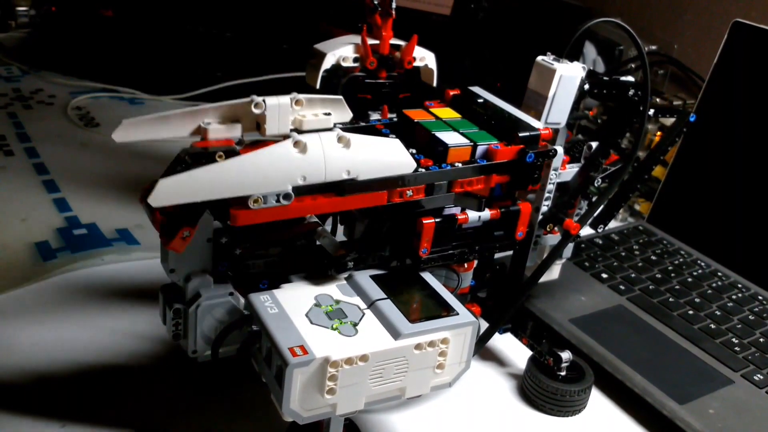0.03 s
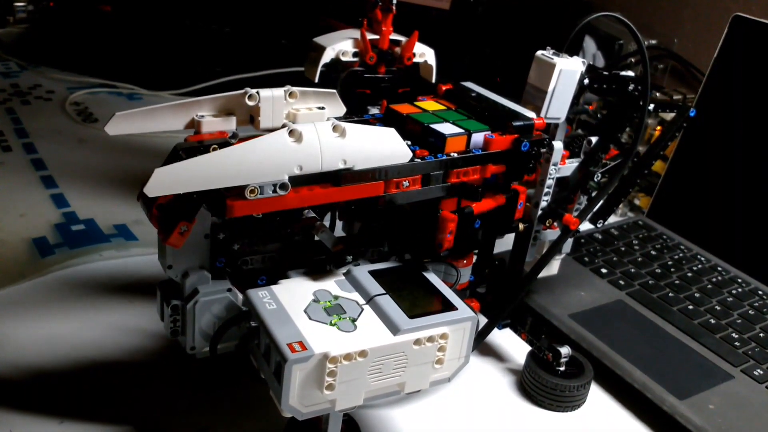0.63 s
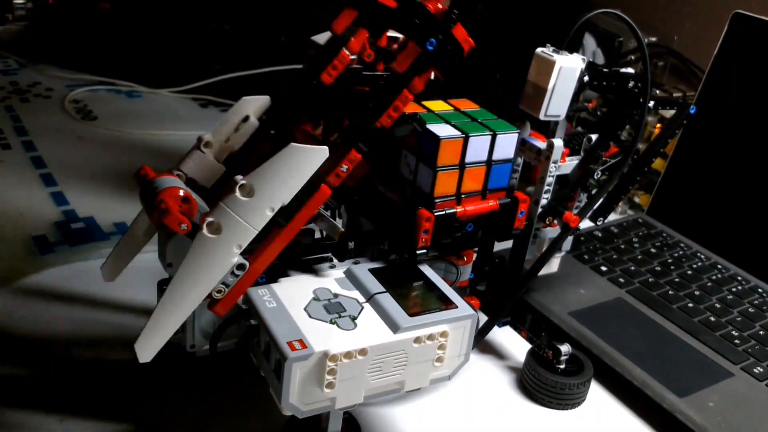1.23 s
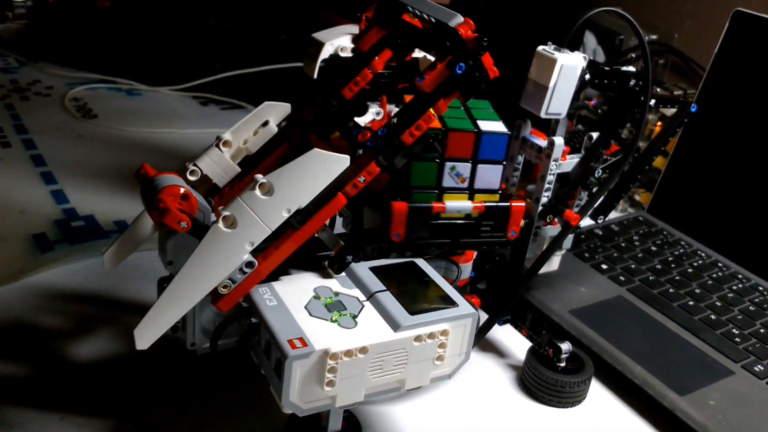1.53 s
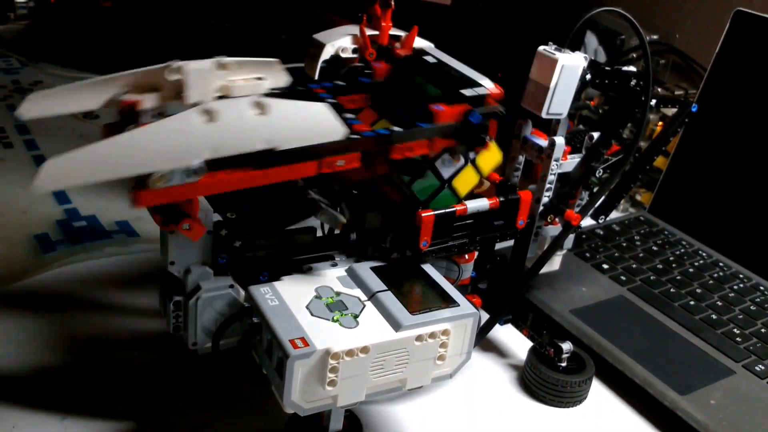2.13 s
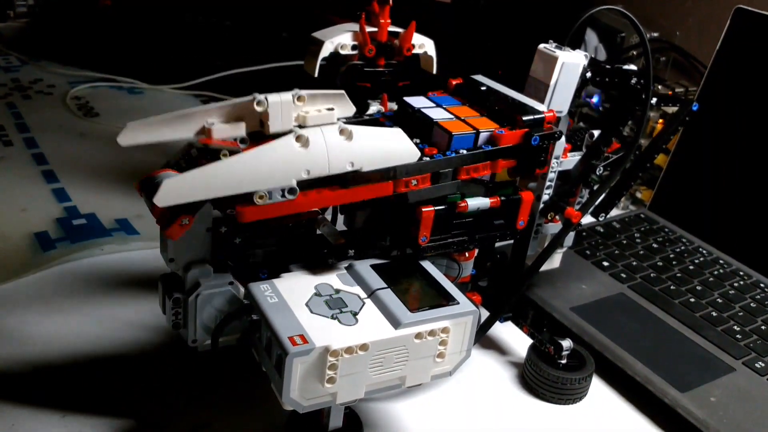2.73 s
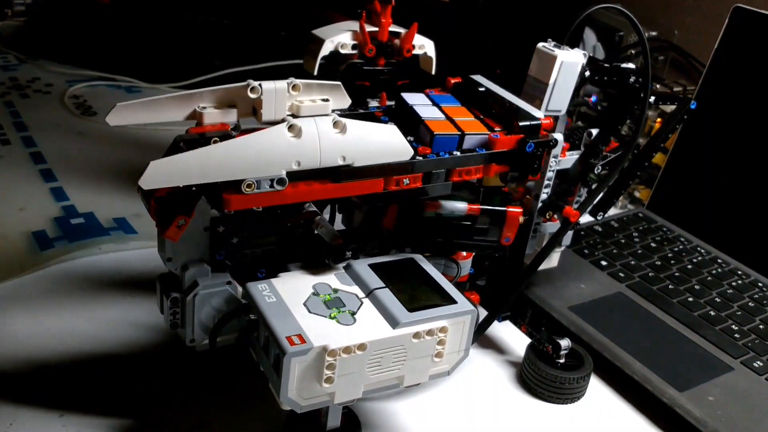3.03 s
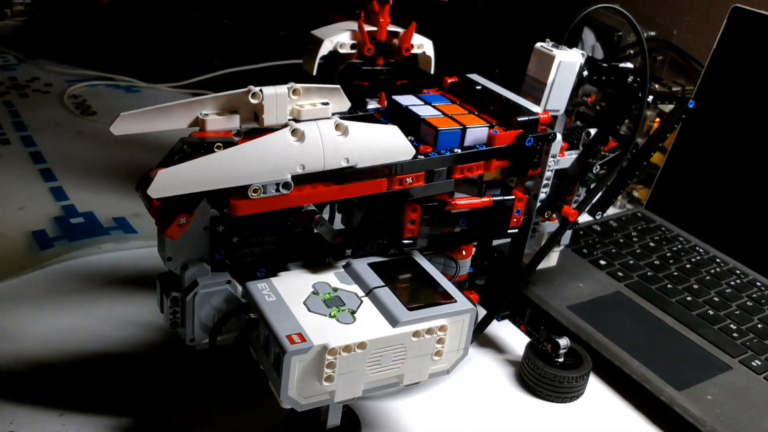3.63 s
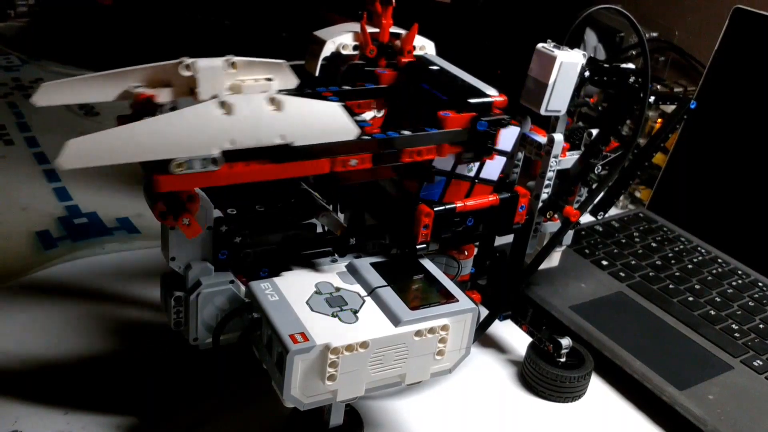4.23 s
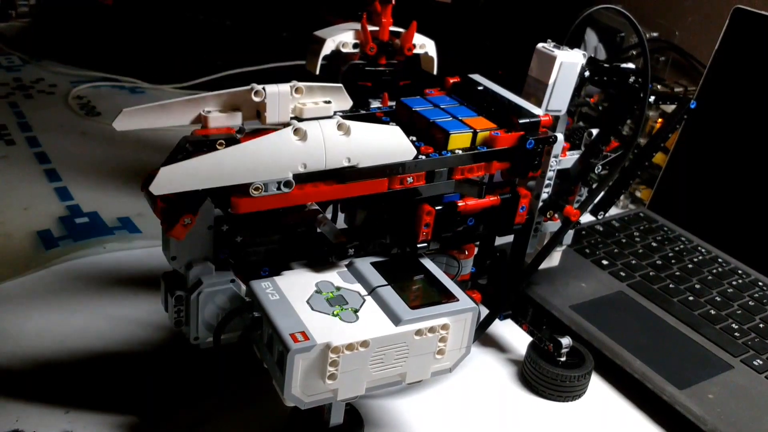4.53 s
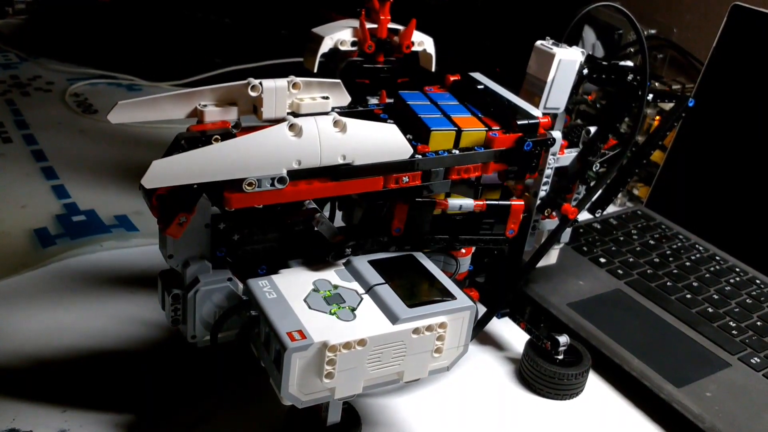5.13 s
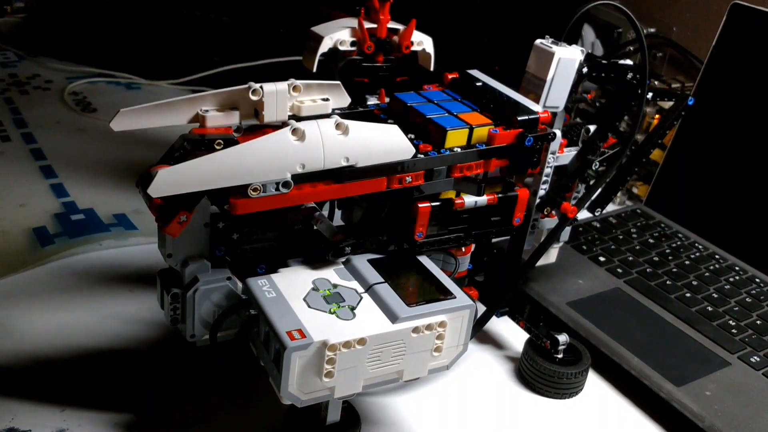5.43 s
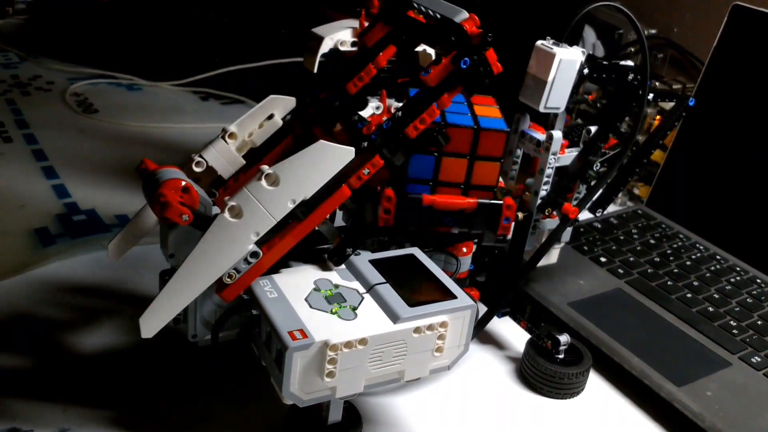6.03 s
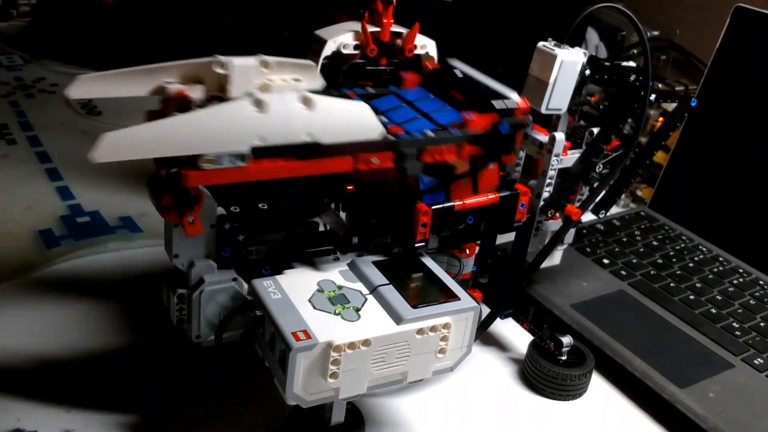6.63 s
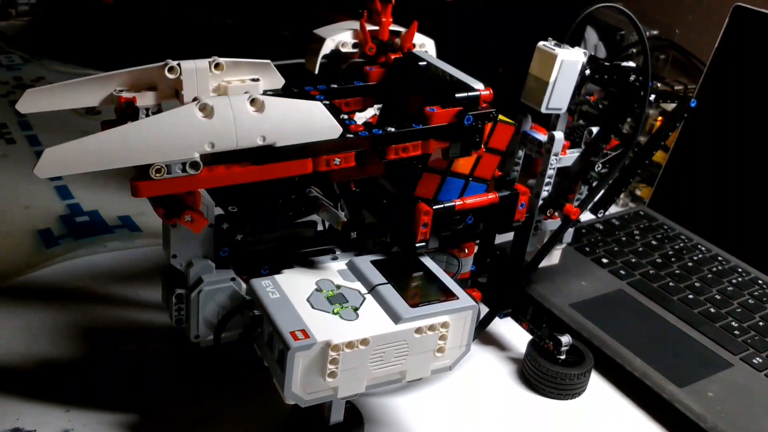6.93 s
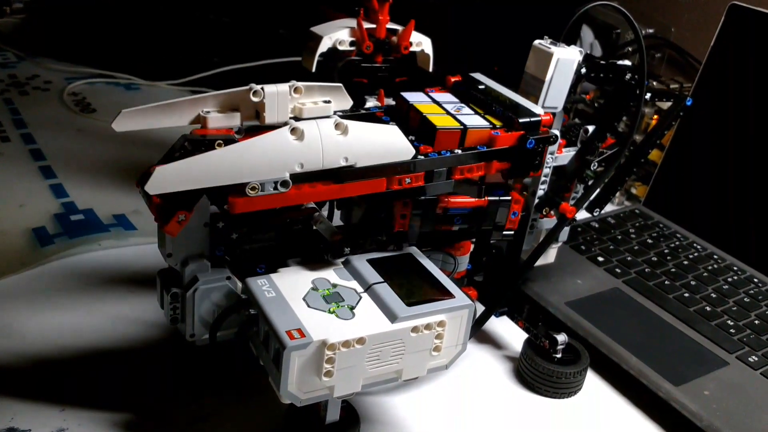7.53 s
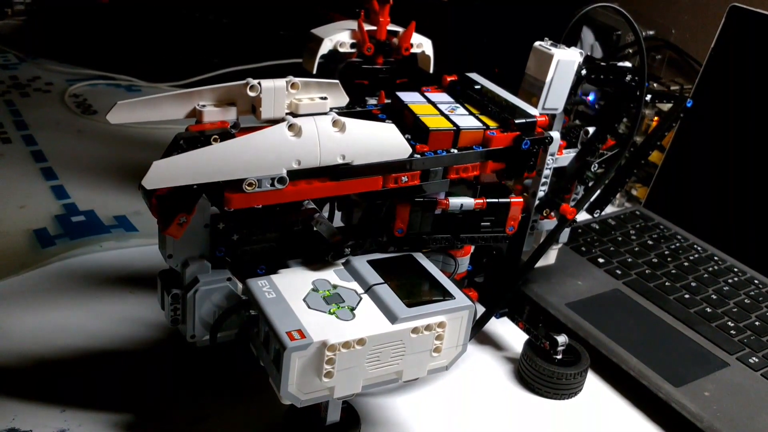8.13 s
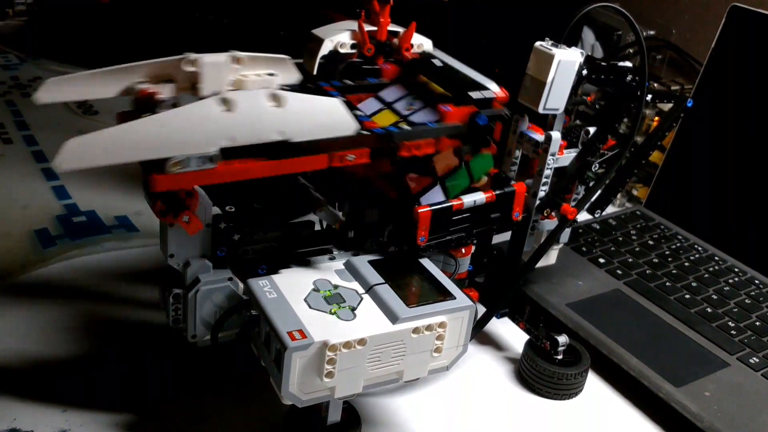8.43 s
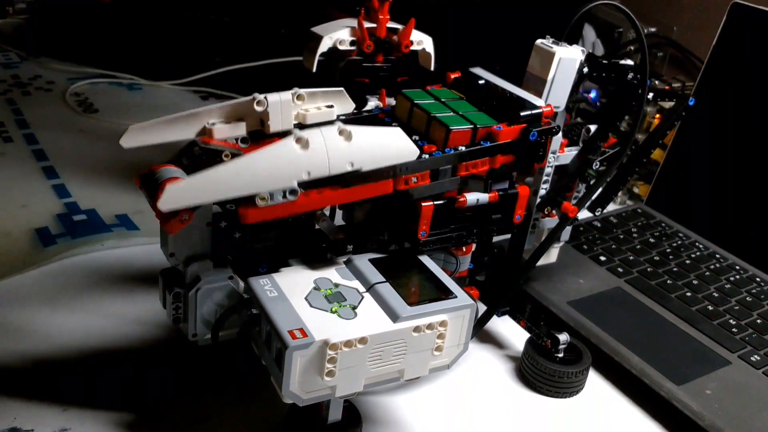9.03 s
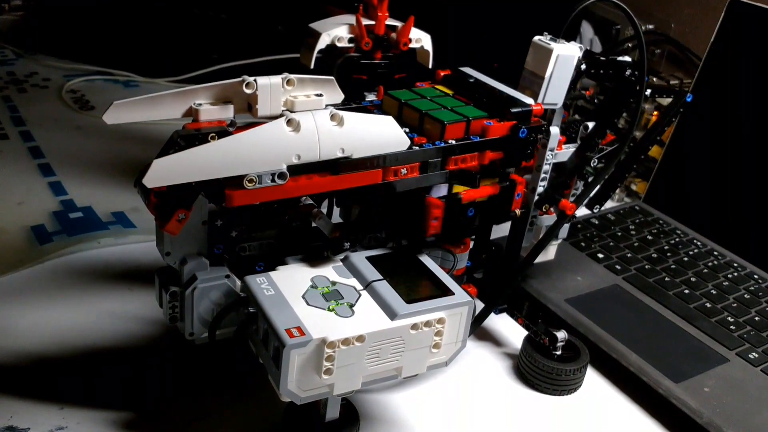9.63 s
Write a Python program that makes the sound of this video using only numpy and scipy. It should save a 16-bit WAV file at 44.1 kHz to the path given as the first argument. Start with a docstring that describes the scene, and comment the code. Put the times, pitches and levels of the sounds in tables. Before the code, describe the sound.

A toy-brick robot's motors whine and rattle in stop-start strokes while a plastic puzzle cube clacks in its cradle, heard up close.

```python
"""On a table in a quiet room, a toy-brick robot works a puzzle cube close to a pair of microphones.
Two geared motors take turns: one spins the turntable, the other lifts the arm and flips the cube.
Periodic meshing of their plastic teeth makes a whine, uneven impacts make a rattle, and the housings
filter both. Blows excite the cube's damped modes as it clacks in its cradle; the frame thuds dully
and the room hums behind."""
import sys
import numpy as np
from scipy import signal
from scipy.fft import rfft, irfft, next_fast_len
from scipy.io import wavfile
from scipy.ndimage import uniform_filter1d

SR = 44100
rng = np.random.default_rng(int(sys.argv[2]) if len(sys.argv) > 2 else 0)


def master(y):
    """Save y as 16-bit WAV."""
    cut = np.clip(np.atleast_2d(y).T, -1, 1)
    pcm = np.round(cut * 32767)  # scale
    wavfile.write(sys.argv[1], SR, pcm.astype(np.int16))


N = 435266
TIME = np.arange(N) / SR
FFT_SIZE = next_fast_len(N + SR // 2)
BINS = np.fft.rfftfreq(FFT_SIZE, 1 / SR)

# Turntable moves. Each row: start, drive time and braking time in seconds, level and relative whine
# in dB, free-running tooth rate in Hz, share of free spin, share of twisting the held cube.
TURNTABLE_MOVES = [(-.005, 0.042, 0.15, -34.5, -24, 852.5, 0.01, 0.06),
                   (.15, 0.058, 0.062, -57, 14, 862.3, 0.02, 0),
                   (.207, 0.42, 0.15, -29.5, 4.5, 1076, 0.86, 0.02),
                   (.848, .11, 0.14, -31.5, -6, 1068, 0, 0.56),
                   (1.278, 0.32, 0.2, -31, 4.5, 1117, 0.97, 0.01),
                   (2.916, 0.45, 0.17, -29, -4, 1055, 0.05, 0.98),
                   (3.57, 0.11, 0.14, -32.5, -2, 1068, 0, 0.01),
                   (4.7, .438, .165, -29.5, -3.5, 1065, 0.02, 0.96),
                   (5.358, .1, .165, -31, .5, 1055, 0.05, 0), (5.815, 0.32, 0.23, -31.5, 1, 1129, 0.86, 0),
                   (7.485, .422, .15, -29.5, -2.5, 1068, 0, 0.98),
                   (8.129, 0.097, 0.15, -33, 3.5, 1062, 0.02, 0.01),
                   (9.243, 0.7, .15, -30, 7, 1074, 1, 0.01)]
# Arm strokes; tipping the cube takes a push and a pull, each with a nudge after it. Each row: start,
# drive time and braking time in seconds, level and relative whine in dB, free-running tooth rate
# in Hz, level of the cube's jiggling in dB.
ARM_STROKES = [(1.044, 0.12, 0.26, -26, -11.5, 971, -55), (1.69, 0.15, 0.16, -28.5, -8.5, 932, -50),
               (2.019, 0.15, 0.59, -31.5, -11, 960.4, -52), (2.443, 0.22, .2, -29, -9, 930, -42),
               (2.708, 0.072, 0.11, -31.5, -10, 948, -50), (3.775, 0.17, 0.28, -28.5, -15, 902.5, -57),
               (4.04, 0.079, 0.12, -35.5, -3, 927, -39.5), (4.222, 0.16, .3, -28, -26, 975.4, -50),
               (4.493, 0.043, 0.13, -32.5, -5, 933.5, -56), (5.586, .13, .27, -24, -13.5, 937.5, -64),
               (6.25, .12, 0.17, -25.5, -29, 936, -41), (6.571, .16, 0.2, -30, -7.5, 875.5, -51.5),
               (6.83, .04, .18, -36.5, 1, 923, -37.5), (7.012, 0.19, 0.2, -27.5, -28, 963, -57),
               (7.269, 0.023, 0.23, -33, -14, 950, -52.5), (8.322, 0.16, 0.36, -26, -9.5, 873, -40),
               (8.588, 0.045, 0.18, -34.5, 6, 926.5, -37.5), (8.76, 0.22, 0.072, -28, -27, 970.5, -40),
               (9.022, 0.04, 0.18, -33.5, -10, 975, -54)]
# Envelope settings of each motor's moves.
TURNTABLE_ENVELOPE = dict(rise_s=.03, rise_share=.16, surge_db=2.5, surge_s=.08, fade=2.7)
ARM_ENVELOPE = dict(rise_s=.036, rise_share=.48, surge_db=2.2, surge_s=.07, fade=2.84)
# Relative levels in dB of successive harmonics of the tooth rate.
TURNTABLE_HARMONICS = [-14, -10.3, -12, -9.5, -14.5]
ARM_HARMONICS = [-22, -10, -6, -5, -7.5, -12, -14, -12, -17, -17, -14, -12, -15]
# The turntable's second pair of wheels. Each row: multiple of the tooth rate, relative level in dB.
SECOND_MESH = [(2.4, -18), (2.6, -24), (3.4, -21), (5.4, -21)]
# Gears sing until the load catches them. Each row: peak time and half-length in seconds, swell in dB,
# share of speed lost.
TURNTABLE_SQUEALS = [(.325, 0.056, 10, 0), (.395, 0.017, 13.5, 0), (.652, .03, 9, 0.03),
                     (1.385, 0.041, 4.5, 0), (3.052, 0.047, 14, 0.01), (3.117, 0.028, 16, 0.04),
                     (3.262, 0.023, 19, 0), (3.378, 0.027, 10, 0), (4.838, 0.049, 13.5, 0.04),
                     (4.903, 0.028, 11, .06), (5.152, 0.033, 15, 0.03), (5.93, 0.052, 10.5, 0.03),
                     (7.625, .055, 10.5, 0.05), (7.694, 0.021, 11.5, 0.11), (7.835, 0.023, 20, 0.06),
                     (7.922, 0.027, 20, 0), (9.365, 0.053, 9, 0.03), (9.42, .03, 8, .01)]
ARM_CHIRPS = [(1.163, .04, 10, 0.01), (5.688, .028, 8.5, 0.01), (5.724, .024, 7.5, 0.11),
              (6.69, .045, 4, 0), (8.465, .04, 4, .02)]
# Broad responses of the gear housings. Each row: frequency in Hz, relative gain in dB.
TURNTABLE_RESPONSE = [(80, -8), (600, -18), (1150, -14), (2300, -6), (3300, -11), (4000, -0.5),
                      (4700, -2.5), (6300, -2.5), (8200, -3), (10500, 3.5), (12300, 1.5), (13300, -6),
                      (15700, -10)]
ARM_RESPONSE = [(80, -11), (600, -20), (1000, -9), (1500, -7), (3000, -2), (4600, -4), (6500, 2.5),
                (7900, 0.5), (10600, 3), (12000, 2.5), (14000, -8.5), (15700, -6)]
# Resonances and gaps. Each row: centre and width in Hz, gain in dB.
TURNTABLE_RESONANCES = [(1460, 600, 13.2), (2765, 670, 14.8), (3610, 100, 8.8), (6980, 2750, 9.6),
                        (9060, 350, 6.3)]
SPIN_RESONANCES = [(1550, 500, -5), (2800, 400, -4), (3950, 500, -5), (4850, 400, -5), (5650, 300, -3),
                   (7500, 300, 5), (8050, 300, -3), (9550, 450, 9), (10720, 500, 5.5)]  # while the cube spins freely
TWIST_RESONANCES = [(1050, 90, 4), (1450, 300, -3), (2060, 200, 9), (2800, 260, 1), (3330, 200, -4),
                    (8700, 250, 4), (9970, 280, 12), (12350, 700, 6)]  # while one layer is twisted against the arm
ARM_RESONANCES = [(1420, 300, 7), (2540, 300, 7), (3830, 300, 4), (4300, 1350, 8.2), (5550, 700, 2),
                  (9000, 900, 4), (10550, 400, 2.5), (11450, 450, 2), (12400, 900, -1)]
FRAME_RESONANCES = [(85.6, 40, 17.5), (148, 19, 16), (258, 22, 2.5)]  # the whole frame on the table
# Room noise. Each row: frequency in Hz, relative spectral density in dB.
ROOM_SPECTRUM = [(20, -46), (50, -13), (90, 10), (150, -0.5), (260, 1.5), (500, -3.5), (800, -2.5),
                 (1300, -12), (2400, -5), (3300, -21.5), (4000, -16), (8000, -21.5), (11000, -24),
                 (15700, -32)]
# Electronic whistles. Each row: frequency in Hz, level in dB.
WHISTLE_TONES = [(13220, -74), (14480, -74)]
# Thuds of the frame. Each row: start in seconds, level in dB, length in seconds, pitch in Hz.
FRAME_THUDS = [(0.371, -44.5, 0.019, 560), (0.522, -36, 0.08, 197), (.91, -42, 0.076, 130.4),
               (1.075, -57, 0.035, 120.6), (1.305, -33.5, 0.061, 223), (1.312, -47, 0.0693, 90.1),
               (1.827, -43.5, 0.051, 898), (2.873, -42.5, 0.046, 169.1), (2.869, -38, 0.076, 85),
               (3.083, -49, 0.029, 811), (5.051, -43, 0.066, 106), (7.191, -52, 0.18, 148.3),
               (9.035, -49, 0.027, 560)]
# Plastic clacks. Each row: start in seconds, level in dB, crack against ring in dB, pitch in Hz.
CUBE_CLACKS = [(.677, -26, -4, 1287), (1.081, -34, -2, 1360), (1.122, -27.5, 9.5, 1280),
               (1.798, -23, 2.5, 1360), (1.815, -30, -3, 1370), (1.847, -20.5, -7, 1366),
               (1.855, -26.5, 11.5, 1310), (2.104, -28, 4, 1503), (2.214, -28, -16, 1370),
               (2.233, -17.5, -14, 1412), (2.249, -18.5, -6, 1410), (2.263, -36, -3, 1330),
               (2.277, -39, -2, 1392), (2.328, -29, -2, 1450), (2.394, -39, 3, 1410),
               (2.586, -18, -2.5, 1460), (3.082, -19, -4, 1670), (3.089, -29, -10, 1042),
               (3.268, -32.5, 13, 1298), (3.852, -27.5, 9, 1446), (3.957, -27, -12, 1470),
               (4.02, -25, -1, 1417), (4.12, -22, -9, 1346), (4.229, -46, 11, 1398),
               (4.344, -24, -19, 1639), (4.38, -24.5, 8, 1328), (4.42, -26, -11, 1380),
               (4.467, -34, 14.5, 1408), (5.742, -38, 15, 1250), (6.351, -23, 3.5, 1397),
               (6.383, -32, 13.5, 1412), (6.65, -30.5, 5, 1358), (6.786, -23.5, -23, 1377),
               (6.807, -29, -18, 1360), (6.846, -34, -15, 1388), (6.878, -42, -18, 1510),
               (6.904, -27.5, 4, 1650), (6.946, -34, -9, 1500), (6.963, -38, -14, 1480),
               (6.99, -32, -13, 1406), (7.073, -23.5, 0, 1320), (7.148, -18.5, -4, 1370),
               (7.203, -22.5, -9, 1377), (7.253, -26, -2, 1405), (7.597, -28, 0, 1350),
               (7.661, -28.5, -8, 1324), (7.802, -30, -3, 1332), (7.832, -28, 5, 1391),
               (8.412, -28, 6.5, 1405), (8.492, -33, -17, 1360), (8.52, -32, -12, 1310),
               (8.561, -20.5, -13, 1470), (8.568, -27.5, 6.5, 1750), (8.642, -27, 2, 1480),
               (8.661, -27, -16, 1460), (8.743, -25, -11, 1370), (8.759, -27, -11, 1449),
               (8.818, -23, -9, 1333), (8.843, -17, -18, 1557), (8.925, -30.5, 11.5, 1334),
               (8.942, -27, -12, 1415), (8.966, -32.5, 6, 1454), (8.986, -32.5, 12.5, 1449),
               (9.362, -24, -11, 1346), (9.698, -23.5, -4.5, 1390), (9.742, -32, -19, 1405)]
# The cube in its cradle. Each row: nominal frequency in Hz, relative level in dB, t60 in seconds.
CRADLED_MODES = [(730, -20, .022), (860, -16, .028), (1300, -5, .022), (1420, 0, .022), (1550, -2, .02),
                 (1690, -9, .014), (2250, -6, .011), (2750, -5, .013), (3600, -5, .013), (5400, -10, .009)]
# Runs of ticks in the arm's gears. Each row: start and length in seconds, level in dB.
TICK_RUNS = [(1.952, .06, -55), (2.449, .01, -34), (2.871, .03, -48), (4.222, .022, -40),
             (4.668, .035, -45), (6.53, .035, -51.5), (6.981, .05, -41), (8.754, .025, -33),
             (9.196, .045, -51)]
# Reverberation of the room. Each row: frequency in Hz, t60 in seconds.
ROOM_DECAY = [(200, 0.45), (1500, 0.38), (6000, 0.3), (15000, 0.0047)]
# Likeness of the two microphones at its best. Each row: frequency in Hz, coherence from 0 to 1.
COHERENCE = [(50, .95), (300, .8), (1000, .99), (2150, .995), (4400, .985), (6450, .97), (7500, .88),
             (9000, .62), (12000, .55), (16000, .35)]
# Lead of the left port beyond the regular comb. Each row: frequency in Hz, phase in radians.
LEFT_LEAD = [(130, -2.8), (230, -.2), (700, 0), (1100, 0), (1600, .8), (1850, .7), (2100, 0), (3700, 0),
             (4400, .25), (5200, 0), (7700, 0), (8100, -1.3), (9000, -1.6), (9400, 0)]
# Balance of each source. Each row: frequency in Hz, left minus right in dB.
TURNTABLE_BALANCE = [(2500, .7), (2950, -2.5), (4200, .5), (4800, -1.5), (6000, 0), (7500, -2), (8700, 5),
                     (9300, -8), (10000, -9), (11000, -5.5), (12400, -6), (12900, 0), (14200, -5),
                     (15500, -2)]
ARM_BALANCE = [(1500, 0), (2950, -4), (3600, 3), (4700, -2.5), (6500, -.5), (8300, 0), (8800, -5.5),
               (9400, -.5), (11400, -7), (13000, -7), (14000, -1)]
ROOM_BALANCE = [(1000, 0.5), (8000, -1.5), (11000, -1), (14000, -3)]


def amp(db):
    """Amplitude grows tenfold with every 20 dB."""
    return 10 ** (np.asarray(db) / 20)


def unit(x):
    """Normalisation to an rms of 1."""
    return x / np.sqrt(np.mean(x ** 2) + 1e-20)


def curve(points, hz=BINS):
    """Interpolation on a logarithmic frequency axis."""
    knots_hz, values = np.transpose(points)
    return np.interp(np.log(hz + 1), np.log(knots_hz + 1), values)


def filtered(x, gain):
    """Linear filtering: the spectrum is multiplied by a gain at each frequency."""
    return irfft(rfft(x, FFT_SIZE) * gain, FFT_SIZE)[..., :N]


def add(mix, start_s, sound):
    """Superposition: a sound sums into the mix from its start time."""
    part = mix[max(round(start_s * SR), 0):][:len(sound)]
    part += sound[:len(part)]


def drift(hz):
    """Random fluctuation of rms 1, lying mostly below hz."""
    points = rng.standard_normal(30000)
    return unit(np.interp(2 * hz * TIME, np.arange(len(points)), points))


def held(moves, column):
    """Sample and hold: a move's value lasts until the next move starts."""
    rows = np.array(moves)
    index = np.maximum(np.searchsorted(rows[:, 0], TIME) - 1, 0)
    return rows[index, column]


def motion(moves, inertia_s):
    """Inertia: speed nears its free value exponentially, then brakes; the whine's gain follows it."""
    start, driven, brake, _, whine_db = (held(moves, column) for column in range(5))
    age = np.maximum(TIME - start, 0)
    braking = np.clip((driven + brake - age) / brake, 0, 1) ** 1.7
    speed = (1 - .8 * np.exp(-age / inertia_s) - .2 * np.exp(-age / inertia_s / 3.2)) * braking
    return speed, amp(whine_db) * speed * braking


def envelope(moves, column, rise_s, rise_share, surge_db, surge_s, fade, reverse_s=.027):
    """Moves add in power: each rises, surges under acceleration, fades, and stops dead for the next."""
    power = np.zeros(N)
    next_starts = [row[0] for row in moves[1:]] + [np.inf]
    for row, next_start in zip(moves, next_starts):
        start, driven, brake = row[:3]
        t = np.arange(0, driven + brake, 1 / SR)
        rise = (1 - np.exp(-t / min(rise_s, rise_share * driven))) ** 2
        surge = amp(surge_db * (t / surge_s * np.exp(1 - t / surge_s)) ** 2)
        stop = np.clip((next_start - start - t) / reverse_s + .67, 0, 1)
        braking = np.clip((driven + brake - t) / brake, 0, 1) ** fade
        gain = amp(row[column]) * rise * surge * stop * braking
        add(power, start, gain[max(round(-start * SR), 0):] ** 2)
    return np.sqrt(power)


def diffuse_tail(t60, samples):
    """Diffuse decay of unit energy: dense echoes of random sign, each band dying at its own rate."""
    hz, t, spectrum = signal.stft(rng.choice([-1., 1.], samples), SR, nperseg=128)
    tail = signal.istft(spectrum * amp(-60 * t / curve(t60, hz)[:, None]), SR, nperseg=128)[1]
    return tail / np.linalg.norm(tail)


def gear_rattle(tooth_hz, waver, jitter, uneven_db, throb, flutter_db, wander_db):
    """Impact and friction of meshing teeth make noise; returns it with the running count of teeth."""
    rate = np.maximum(tooth_hz, 250) * (1 + waver * drift(30) + jitter * drift(250))
    teeth = np.cumsum(rate) / SR
    contacts = np.diff(np.floor(teeth + .15 * drift(500)), prepend=0) > 0
    signs = rng.choice([-1., 1.], N)
    force = amp(uneven_db * np.clip(rng.standard_normal(N), -2, 2))
    strikes = unit(contacts * signs * force / np.sqrt(rate))
    # As the wheels turn, the blows reach different beams, each with its own short ring.
    beam = np.floor(teeth / 40 + 2 * rng.random(N)) % 8
    rings = [diffuse_tail([(1000, .019), (12000, .012)], samples=800) for _ in range(8)]
    rattle = sum(signal.oaconvolve(strikes * (beam == k), ring)[:N] for k, ring in enumerate(rings))
    # A slower wheel makes the rubbing pulse at a third of the tooth rate.
    rub = rng.standard_normal(N) * (1 + throb * np.cos(2 * np.pi * teeth / 3))
    flutter = amp(flutter_db * drift(70) + wander_db * drift(20))
    return unit(rattle + rub / 2) * flutter, teeth


def gear_whine(teeth, harmonics, slip_rad, extra_partials=(), squeal_db=0, flicker_db=3.5):
    """Periodic meshing makes wavering tones; a squeal steadies them and lifts harmonics 2 and 3."""
    looseness, lift = amp(-squeal_db / 2), {2: .6, 3: 1}
    out = np.zeros(N)
    for order, db in [*enumerate(harmonics, 1), *extra_partials]:
        gain = amp(db + squeal_db * lift.get(order, 0) + looseness * flicker_db * drift(55))
        slip = looseness * slip_rad * np.sqrt(order) * drift(110)
        out += gain * np.sin(2 * np.pi * order * teeth + slip)
    return out


def squeals(rows):
    """Loading of the gears: a tone swells, then the speed sags, most as the swell dies away."""
    swell_db, sag = np.zeros(N), np.zeros(N)
    for peak_s, half_s, db, loss in rows:
        window = np.hanning(int(2 * half_s * SR))
        add(swell_db, peak_s - half_s, db * window ** .7)
        add(sag, peak_s, loss * window)
    return swell_db, sag


def squeaks(range_hz=(2650, 3250), per_s=30, length_s=.028, fall=.07):
    """Stick-slip friction between the cube's twisted layers gives short, falling squeaks."""
    out, progress = np.zeros(N), np.linspace(0, 1, int(length_s * SR))
    window = np.sin(np.pi * progress) ** 2
    for when, pitch, strength in rng.random((int(per_s * N / SR), 3)):
        hz = np.interp(pitch, [0, 1], range_hz) * (1 - fall * (progress - .5))
        add(out, when * N / SR, 2 * strength * window * np.sin(2 * np.pi * np.cumsum(hz) / SR))
    return amp(-20) * out


def housing(drive, response, resonances):
    """Forced vibration: the plastic frame's resonances colour what the gears feed into it."""
    peaks_db = sum(db / (1 + (2 * (BINS - hz) / width) ** 2) for hz, width, db in resonances)
    return filtered(drive, unit(amp(curve(response) + peaks_db)))


def turntable():
    """Source and filter: gear noise meets resonances that change as the cube is spun or twisted."""
    spin, twist = (np.clip(uniform_filter1d(held(TURNTABLE_MOVES, column), size=800), 0, 1)
                   for column in (6, 7))
    speed, whine_gain = motion(TURNTABLE_MOVES, inertia_s=.037 + .007 * spin)  # the cube adds inertia
    squeal_db, sag = squeals(TURNTABLE_SQUEALS)
    tooth_hz = held(TURNTABLE_MOVES, column=5) * speed * (1 - sag)
    # Twisted layers catch, so the speed falters under that load.
    rattle, teeth = gear_rattle(tooth_hz, waver=.006 + .003 * twist, jitter=.008 + .004 * twist,
                                uneven_db=2, throb=.16, flutter_db=1.88, wander_db=.5)
    whine = gear_whine(teeth, TURNTABLE_HARMONICS, slip_rad=.22,
                       extra_partials=SECOND_MESH, squeal_db=squeal_db)
    drive = rattle + whine_gain * whine + twist * speed * squeaks() / amp(squeal_db)
    states = [(1 - spin - twist, []), (spin, SPIN_RESONANCES), (twist, TWIST_RESONANCES)]
    radiated = sum(share * housing(drive, TURNTABLE_RESPONSE, TURNTABLE_RESONANCES + extra)
                   for share, extra in states)
    return amp(1) * envelope(TURNTABLE_MOVES, column=3, **TURNTABLE_ENVELOPE) * radiated


def still_room():
    """The noise floor: a broad, slightly wandering spectrum with faint electronic pure tones."""
    wander = amp(.6 * drift(5))
    noise = amp(-51) * unit(filtered(rng.standard_normal(N), amp(curve(ROOM_SPECTRUM))))
    whistles = sum(amp(db) * np.sin(2 * np.pi * hz * TIME) for hz, db in WHISTLE_TONES)
    return noise * wander + whistles


def thuds():
    """Bumps of the frame: a brief, low band of noise sounds dull and has only a vague pitch."""
    out = np.zeros(N)
    for start, db, length, hz in FRAME_THUDS:
        samples = int(length * SR)
        band = signal.butter(3, [hz / 2.4, hz * 1.45], "band", fs=SR, output="sos")
        bump = signal.sosfilt(band, rng.standard_normal(samples)) * np.hanning(samples)
        add(out, start, amp(db) * unit(bump))
    return out


def cube_ring(t, pitch_hz, low_db, low_edge_hz=1150, nominal_hz=1400, spread_db=3.5, detune=.035):
    """Free vibration: damped modes, varied by chance, at a pitch set by where the blow lands."""
    ring = np.zeros(len(t))
    for hz, db, t60 in CRADLED_MODES:
        level_db = db + low_db * (hz < low_edge_hz) + spread_db * rng.standard_normal()
        mode_hz = hz * pitch_hz / nominal_hz * (1 + detune * rng.standard_normal())
        ring += amp(level_db - 60 * t / t60) * np.sin(2 * np.pi * (mode_hz * t + rng.random()))
    return ring


def clacks(crack_decay_s=.0015, full_blow_db=-19.5):
    """Impact of plastic on plastic: a broadband crack at contact, then the cube's short ring."""
    rings, cracks, t = np.zeros(N), np.zeros(N), np.arange(3000) / SR
    ring_attack = (1 - np.exp(-t / .0005)) ** 2
    crack_shape = np.exp(-t / crack_decay_s) * (1 - np.exp(-t / .00069))
    for start, db, crack_db, pitch_hz in CUBE_CLACKS:
        low_db = min(.97 * (db - full_blow_db), 2)  # only heavy blows shake the lowest modes
        ring = cube_ring(t, pitch_hz, low_db) * ring_attack
        add(rings, start, amp(db + 2.3) * ring / abs(ring).max())
        add(cracks, start, amp(db + 5.2 + crack_db) * rng.standard_normal(len(t)) * crack_shape)
    colour_db = curve([(100, -9), (800, 2.5), (3000, 2), (8000, 7), (12000, 1), (16000, -5)])
    return rings + filtered(cracks, amp(colour_db))


def arm():
    """Gear noise in short, rough strokes; where the teeth mesh cleanly, rattle gives way to a chirp."""
    speed, whine_gain = motion(ARM_STROKES, inertia_s=.034)
    swell_db, sag = squeals(ARM_CHIRPS)
    tooth_hz = held(ARM_STROKES, column=5) * speed * (1 - sag)
    roughness = amp(-.7 * swell_db)
    rattle, teeth = gear_rattle(tooth_hz, waver=.014 * roughness, jitter=.012,
                                uneven_db=4, throb=.5, flutter_db=1.5, wander_db=.7)
    whine = whine_gain * amp(swell_db) * gear_whine(teeth, ARM_HARMONICS, slip_rad=.25)
    drive = envelope(ARM_STROKES, column=3, **ARM_ENVELOPE) * (roughness * rattle + whine)
    return amp(-.5) * housing(drive + chatter(), ARM_RESPONSE, ARM_RESONANCES + FRAME_RESONANCES)


def jiggle(per_s=85, uneven_db=6.5, pitches=6):
    """Random impacts: the loose cube rings against its cradle while the arm moves it."""
    out, t = np.zeros(N), np.arange(3000) / SR
    for _ in range(pitches):
        knocks = rng.random(N) < per_s / pitches / SR
        force = amp(uneven_db * np.clip(rng.standard_normal(N), -2, 1.5))
        ring = cube_ring(t, pitch_hz=rng.uniform(1280, 1580), low_db=-10)
        out += signal.oaconvolve(knocks * force, ring)[:N]
    gain = envelope(ARM_STROKES, column=6, **dict(ARM_ENVELOPE, fade=.94))
    return amp(-.5) * gain * unit(out)


def chatter(gap_s=.0115, decay_s=.003, uneven_db=2):
    """Backlash: the arm's motor hunts between strokes and its slack teeth tap to and fro."""
    out, t = np.zeros(N), np.arange(800) / SR
    for start, length, db in TICK_RUNS:
        for k, (late, strength) in enumerate(rng.uniform(-.67, 1, (8, 2))):
            tick = amp(db + uneven_db * strength) * rng.standard_normal(len(t)) * np.exp(-t / decay_s)
            if k * gap_s < length:
                add(out, start + (k + late / 10) * gap_s, tick)
    return out


def in_room(x, wet_db):
    """Reverberation: the short tail of a small furnished room follows the direct sound."""
    return x + amp(wet_db) * signal.oaconvolve(x, diffuse_tail(ROOM_DECAY, samples=16000))[:N]


def microphones(source, balance, comb_hz=1078):
    """Partial coherence: two ports fall in and out of phase up the spectrum and share only some sound."""
    half_turns = np.maximum(BINS / comb_hz - 1, 0)
    phase = curve(LEFT_LEAD) - np.pi * half_turns + np.sin(2 * np.pi * half_turns) / 4
    coherence = np.clip(curve(COHERENCE) * (1 - .5 * np.sin(np.pi * half_turns) ** 4), 0, 1)
    # Each call of the source draws fresh noise.
    common = np.sqrt((1 + coherence) / 2) * rfft(source(), FFT_SIZE)
    scattered = np.sqrt((1 - coherence) / 2) * rfft(source(), FFT_SIZE)
    lean = amp(curve(balance) / 2)
    left = (common + scattered) * lean * np.exp(.5j * phase)
    right = (common - scattered) / lean * np.exp(-.5j * phase)
    rms_gain = np.sqrt((lean ** 2 + lean ** -2) / 2)
    return irfft(np.array([left, right]) / rms_gain, FFT_SIZE)[:, :N]


def scene():
    """Superposition of both motors, the cube and the room at the microphone pair."""
    spinning = microphones(lambda: in_room(turntable(), wet_db=-13), TURNTABLE_BALANCE)
    lifting = microphones(lambda: in_room(arm(), wet_db=-16), ARM_BALANCE)
    knocks_and_room = microphones(
        lambda: in_room(clacks() + jiggle() + thuds(), wet_db=-14) + still_room(), ROOM_BALANCE)
    return spinning + lifting + knocks_and_room


def record(dry):
    """Band limiting: the microphones roll off the bass and the recorder cuts the highest treble."""
    highpass = signal.butter(4, 54, "high", fs=SR, output="sos")
    lowpass = signal.firwin(511, 15850, window=("kaiser", 9), fs=SR)
    return signal.oaconvolve(signal.sosfilt(highpass, dry), lowpass[None], "same")


dry = scene()
out = record(dry)
master(out)
```